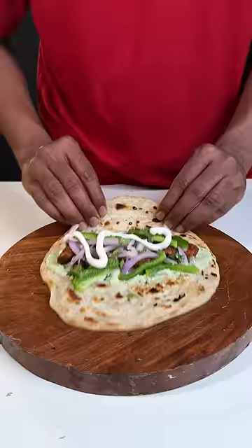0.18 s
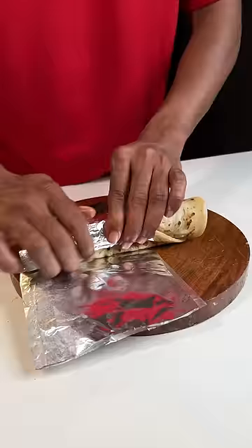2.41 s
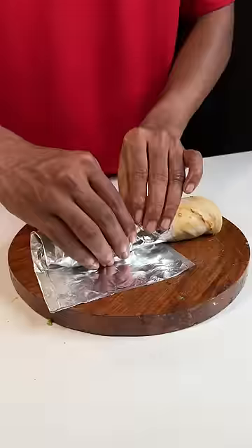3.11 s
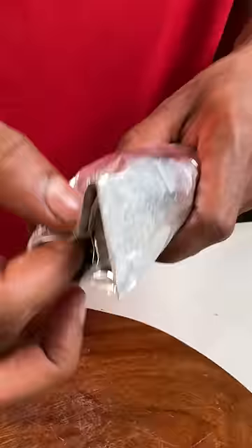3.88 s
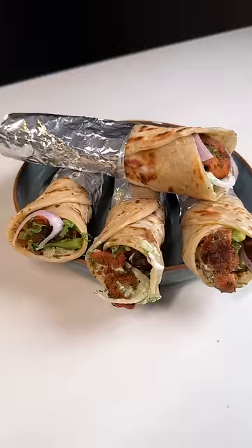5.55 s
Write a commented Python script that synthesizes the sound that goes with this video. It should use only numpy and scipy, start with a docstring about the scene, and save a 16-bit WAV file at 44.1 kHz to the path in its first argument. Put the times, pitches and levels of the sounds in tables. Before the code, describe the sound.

In a quiet kitchen, hands roll a flatbread on a wooden board: an early tap, faint ticks, soft brushing and dull knocks, some cut off abruptly. A stronger thump and swish land just after two seconds. Then foil takes over, hissing, crinkling and snapping in bright, dense bursts as it is folded and twisted. It stops after about five seconds, leaving low room noise. Close, wide stereo phone microphone.

```python
"""Aluminium foil hisses, crackles and snaps as hands fold and twist it round a flatbread in a quiet kitchen.
Its rustle is noise under squeeze envelopes; its snaps are short noise bursts, each with a pop at its own pitch.
Before that the hands roll the bread: brushes of noise and ticks, and modes that knock on a wooden board and table.
Some booms and brushes are chopped off. The board's edge is tapped early; pitched and low room noise lie below."""
import sys
import numpy as np
from scipy import signal
from scipy.fft import rfft, irfft, next_fast_len
from scipy.io import wavfile
from scipy.ndimage import uniform_filter1d, minimum_filter1d

SR = 44100
rng = np.random.default_rng(int(sys.argv[2]) if len(sys.argv) > 2 else 0)


def file_out(sig):
    """Save sig as 16-bit WAV at sys.argv[1]."""
    # one column per channel
    cols = np.atleast_2d(sig).T
    # limit, then scale
    lim = np.clip(cols, -1, 1)
    pcm = np.round(lim * 32767).astype(np.int16)
    wavfile.write(sys.argv[1], SR, pcm)


def ratio(d):
    """dB to gain"""
    e = np.asarray(d, float) / 20
    return 10 ** e


N = 268569

# Short ticks and snaps: the opening hit and hand ticks, then foil creases from 2.4 s. Each row: start in seconds,
# treble in dB and crack in dB (both before trim), crack pitch in Hz, nominal length in ms.
SNAPS = [(0.0036, -73, -27, 856, 4), (0.0414, -59, -23, 890, 4.4), (0.272, -58.5, -85, 2210, .8),
         (0.3125, -60, -85, 2175, .8), (0.3962, -37.5, -71, 2230, 1.14), (0.4837, -48.5, -74, 2800, 1.6),
         (0.553, -41, -63, 2050, 0.8), (0.8404, -43.5, -62, 2370, 0.87), (0.874, -34, -24.5, 1870, 4),
         (0.906, -35, -42, 2065, 3.4), (0.932, -38.5, -35.5, 2007, 5), (0.9506, -41, -45, 2300, 1.8),
         (0.998, -48, -50, 4840, 2.5), (1.0642, -57, -51, 2260, 2.4), (1.195, -79, -62.5, 2100, 2.3),
         (1.286, -55.5, -64, 2530, .8), (1.2971, -51, -50, 2120, .7), (1.4191, -76.5, -52, 2270, 2),
         (1.624, -55, -45.5, 3800, 3), (1.7301, -52, -26, 3450, 0.74), (2.4411, -20, -15.5, 1374, 0.72),
         (2.476, -31.5, -27, 1106, 1.5), (2.4894, -22, -38, 1180, 9.7), (2.515, -15.5, -33, 2212, 1.9),
         (2.544, -35, -33.5, 2400, 1.2), (2.619, -42.5, -52, 1700, 3.4), (2.642, -32, -36.5, 1670, 1.5),
         (2.68, -16.5, -41, 3720, 1.2), (2.696, -21, -44, 3400, 1), (2.7001, -17.5, -33, 3420, 1),
         (2.709, -19.5, -22, 3400, 1.2), (2.733, -24, -24, 2990, 2), (2.7284, -19.5, -23.5, 3060, 1.6),
         (2.76, -32, -34, 2640, 1.6), (2.82, -27, -43, 3265, 6.3), (2.8472, -23.5, -45, 2500, 6.72),
         (2.8763, -39, -29.5, 2300, 2.1), (2.885, -26.5, -24, 1800, 2.2), (2.9023, -15, -29.5, 1980, 10),
         (2.9407, -29, -47, 3180, 7.4), (2.9737, -23.5, -20.5, 1480, 0.8), (3.0296, -37, -40, 3600, 0.67),
         (2.9898, -42, -29, 873, 2.8), (3.052, -47, -27, 950, 1.15), (3.081, -47, -31, 1040, 1.5),
         (3.093, -48, -38, 897, 1.5), (3.119, -25, -19, 1000, 4.4), (3.148, -23.5, -45, 1913, 2.3),
         (3.157, -15.5, -29.5, 1296, 1.43), (3.1857, -38, -27, 4340, 12), (3.2209, -29, -40.5, 2345, 1),
         (3.247, -27, -42, 2513, 6.2), (3.264, -21.5, -26.5, 1611, 3), (3.2695, -15.5, -26, 2000, 3),
         (3.286, -40.5, -29, 1595, 1.2), (3.2953, -23, -34.5, 2040, 5.8), (3.3003, -32.5, -33.5, 2400, 19),
         (3.3245, -17, -33, 2514, 3.8), (3.3532, -24.5, -31, 2300, 1.6), (3.361, -31, -16.5, 1484, 3.3),
         (3.383, -16, -41, 3310, 1.2), (3.395, -17.5, -33, 3830, 2.8), (3.4136, -25.5, -40, 2000, 2.0),
         (3.45, -25, -39.5, 2950, 2.5), (3.5145, -18.5, -27, 2383, 1.5), (3.5228, -22.5, -28, 3900, 5.6),
         (3.548, -22.5, -20.5, 1530, 4.2), (3.5871, -53.5, -23, 1095, 3), (3.6307, -36, -25.5, 2320, 2),
         (3.6344, -26.5, -43, 1900, 3.7), (3.6511, -35, -41, 3200, 2.7), (3.698, -29.5, -31.5, 2600, 4.4),
         (3.7099, -49.5, -20.5, 2225, 1.3), (3.725, -21, -40.5, 3260, 1.0), (3.73, -22, -14.5, 2190, 2.9),
         (3.762, -28.5, -27, 1506, 2.9), (3.7714, -39.5, -18.5, 1300, 2.0), (3.7817, -31, -43, 2360, 1.8),
         (3.7931, -12.5, -14, 1480, 0.94), (3.8011, -36.5, -19.5, 1300, 1.2),
         (3.8673, -20.5, -29.5, 2387, 1.3), (3.872, -22, -34, 4647, 2), (3.8837, -29.5, -25.5, 4700, 1.8),
         (3.8892, -17.5, -18.5, 4836, 4.8), (3.9, -15.5, -27.5, 2301, 1.5), (3.9293, -43, -30, 4800, 1.4),
         (3.9485, -12.5, -21.5, 5000, 2), (3.962, -16, -26, 3420, 1.5), (3.9779, -19.5, -27.5, 3690, 4.6),
         (4.0065, -23, -13.5, 1780, 3.9), (4.037, -13, -22.5, 4600, 1.5), (4.05, -18, -25.5, 4400, 1.9),
         (4.0548, -18.5, -10, 5200, 0.7), (4.137, -25.5, -27.5, 5200, 2.3),
         (4.1509, -13, -20.5, 5100, 0.76), (4.166, -17, -24, 5000, 2.9), (4.174, -24, -22.5, 4896, 7.7),
         (4.2077, -13, -31, 4400, 1.2), (4.227, -14.5, -29.5, 5000, 2), (4.241, -11, -11.5, 4280, 1.8),
         (4.29, -20.5, -26.5, 4200, 0.57), (4.3056, -45, -36, 4000, 1.7), (4.33, -23, -25.5, 3360, 2.9),
         (4.3442, -18, -19.5, 5090, 1.9), (4.3629, -14, -16, 3910, 2.94), (4.427, -31.5, -29.5, 5300, 1.6),
         (4.462, -10.5, -23.5, 5340, 1.2), (4.4717, -20, -23, 5100, 1.4), (4.495, -27.5, -24.5, 4200, 2.5),
         (4.5046, -21, -28, 5220, 1.4), (4.5213, -22.5, -27.5, 5270, 2.6), (4.5261, -23, -22, 5130, 1.3),
         (4.531, -28, -15.5, 5340, 1.4), (4.534, -32, -36, 5300, 2.0), (4.606, -11.5, -20.5, 5060, 0.66),
         (4.629, -15.5, -24.5, 5300, 1.0), (4.6487, -17.5, -24.5, 5340, 2), (4.657, -29, -28, 5300, 3.1),
         (4.7232, -26, -52.5, 5260, 4), (4.7332, -21.5, -27.5, 5220, 2.0), (4.7375, -27, -28, 5330, 5.9),
         (4.7583, -14.5, -25, 5300, .8), (4.7602, -9.5, -17, 5300, 1.2), (4.7766, -28, -29, 5300, 1.7),
         (4.7984, -25, -35, 4900, 1.8), (4.8227, -17.5, -22.5, 5280, 5.9), (4.8286, -15.5, -35, 5100, 1.5),
         (4.839, -43.5, -44, 5200, 2.0), (4.892, -18, -34, 5245, 1), (4.915, -21.5, -55, 5200, 1),
         (4.9302, -33.5, -32, 5150, 1.65), (4.973, -28.5, -39.5, 5170, 1.3), (4.9992, -29, -44, 5220, 1.2),
         (5.0251, -22, -37, 4500, 0.97), (5.0315, -25.5, -15.5, 3940, 0.46),
         (5.0583, -31, -21.5, 3500, 8.7), (5.0675, -16.5, -30, 5130, 1), (5.0751, -25, -22, 4900, 0.8),
         (5.0918, -36, -24.5, 4800, 2.2), (5.175, -34, -56, 5200, 0.72), (5.249, -21, -21, 3670, 3.6)]
# Knocks. Each row: start in seconds, table level in dB, board level in dB (both before mode levels), contact in
# seconds, damping by the hands (a factor), pitch favoured by the spot struck in Hz, pressure held in seconds.
KNOCKS = [(0.031, -36.5, -23, 0.0053, 2.6, 200, 0.0037), (0.053, -47, -35.5, 0.005, 1, 200, 0.0038),
          (0.101, -45, -38.5, 0.0032, 1.7, 200, 0.016), (0.165, -61.5, -85.5, 0.0033, 0.2, 241, 0.0067),
          (.62, -46, -44.5, 0.044, 1.1, 239, 0.0048), (0.874, -35.5, -46, 0.0041, 0.68, 237, 0.029),
          (1.296, -42.5, -44, 0.0085, 1.36, 237, 0.047), (1.34, -65, -43, 0.021, 2.3, 356, 0.01),
          (1.427, -40, -68.5, 0.028, 1.5, 243, 0.0043), (1.555, -23, -17.5, 0.016, 1.55, 201, 0.0033),
          (1.637, -36, -31, 0.0012, 1.18, 237, 0.0327), (1.741, -40, -34, 0.0073, 3.2, 201, 0.014),
          (2.03, -48.5, -73, 0.0073, 3.9, 241, 0.0045), (2.163, -14, -13, 0.011, 0.8, 269, 0.011),
          (2.202, -46.5, -22.5, 0.0056, 1.7, 356, .004), (2.258, -27, -29.5, 0.0068, 0.77, 240, 0.0061),
          (2.29, -49, -25.5, 0.0058, 2.3, 242, 0.015), (2.851, -61, -23, 0.013, 7.6, 307, 0.0046),
          (3.971, -71, -47, 0.015, 1.1, 348, 0.0069), (4.236, -75, -45, 0.0062, 6.2, 350, 0.0041),
          (5.247, -49, -23, 0.0065, 4.9, 298.8, 0.0047), (5.779, -45.5, -70, 0.015, 2.3, 200, 0.0062)]
# Table modes. Each row: frequency in Hz, relative level in dB, t60 in seconds at damping 1.
TABLE_MODES = [(45, -6, 0.3), (116.5, -4.5, 0.75), (155.3, 0, 0.33)]
# Board modes. Each row: frequency in Hz, relative level in dB, t60 in seconds at damping 1.
BOARD_MODES = [(200, -0.5, 0.26), (237, 2, 0.18), (268.5, 0.5, 0.17), (353.3, -1, 0.31), (392, -5, 0.3),
               (473.3, 2.5, 0.12), (520.3, -3.5, 0.1), (770, -7.5, 0.15)]
# Modes of the board's edge. Each row: frequency in Hz, relative level in dB, t60 in seconds at damping 1.
RIM_MODES = [(556, -38, 0.1), (684, -35, .08), (960, -33, 0.07), (1250, -34, .05)]
# Colour of the foil, snap and brush noise. Each row: frequency in Hz, relative level in dB per Hz.
NOISE_COLOUR = [(240, -42.5), (400, -16), (590, -12.5), (648, -8), (1210, -5.5), (2710, -7.5), (4980, -8),
                (5380, -9), (6490, -5), (7820, -8.5), (10500, -11), (12500, -0.5), (14800, 2.5),
                (15700, -0.5), (16500, -40)]
# Stereo width. Each row: frequency in Hz, side over mid in dB.
WIDTH = [(45, -20), (92, -12), (140, -12.5), (210, -15), (330, -6.5), (500, -4.5), (770, -1.5), (1170, -2),
         (1790, -2.5), (2740, 1), (4190, -1), (6410, 0), (9810, 11), (15000, -6)]
# Room noise spectrum. Each row: frequency in Hz, relative level in dB per Hz.
ROOM_COLOUR = [(15, -55), (30, -24), (45, -15), (80, -16), (118, -10), (249, -18.5), (276, -21),
               (1060, -43.5), (1340, -38.5), (1480, -43), (9270, -56), (12000, -65), (15600, -65),
               (22000, -120)]
# Room noise level. Each row: time in seconds, level in dB before trim.
ROOM_LEVEL = [(0.0, -46), (0.3, -63.5), (1.29, -63.5), (1.54, -66), (1.98, -65), (2.19, -60.5),
              (4.02, -54.5), (4.29, -71.5), (4.56, -74), (4.72, -75), (4.9, -70), (4.95, -60.5), (5.4, -68),
              (5.7, -66), (5.8, -62), (5.92, -67), (6.09, -60)]
# Decay of the kitchen's answer. Each row: frequency in Hz, t60 in seconds.
KITCHEN_DECAY = [(500, 0.44), (3000, 0.29), (14000, 0.078)]
# Noise bands, highest first. Each row: lower edge in Hz, upper edge in Hz.
BANDS = [(8000, 16000), (3700, 8000), (1500, 3700), (300, 1500)]
# Times that end the knocks and swells begun before them, in seconds.
CUTS_S = np.array(np.array([.163, .74, 1.1, 1.54, 1.91, 2.398, 7]))
# Hands brushing bread and board. Each row: peak in seconds, treble in dB, body in dB, body gain per lower band
# in dB, rise in seconds, fall in seconds.
STROKES = [(0, -63, -48.5, 1.5, 0.011, 0.071), (0.171, -74, -93, 8.5, .005, 0.026),
           (0.471, -70, -105, 0.5, 0.25, 0.92), (.8, -73, -86.5, -2.5, 0.046, 0.55),
           (0.645, -44, -46.5, 2, 0.055, 0.062), (0.882, -47, -48, 0, 0.015, 0.088),
           (1.07, -73, -92, 5, 0.0036, 0.11), (1.109, -68.5, -80.5, 2, 0.02, 0.11),
           (1.289, -69.5, -85, -19, 0.1, 0.4), (1.572, -45, -51.5, 7.5, 0.025, 0.1),
           (1.616, -59.5, -43.5, 6, 0.029, 0.046), (1.733, -95.5, -52, -0.5, 0.0079, 0.061),
           (2.163, -14.5, -23.5, -3, 0.0064, 0.082)]
# Squeezes and folds of the foil. Each row: peak in seconds, treble in dB, body in dB before the lower-band gains,
# rise in seconds, fall in seconds.
SQUEEZES = [(2.4, -34, -43, 0.0039, 0.96), (2.493, -19, -47, 0.0076, 0.058),
            (2.526, -29, -34, 0.061, 0.049), (2.665, -32, -45.5, 0.0074, 0.1),
            (2.849, -44, -54, 0.016, 0.051), (2.891, -26.5, -46.5, 0.017, 0.083),
            (2.941, -32.5, -39, 0.11, 0.12), (3.116, -40, -47, 0.0025, 0.26), (3.3, -54.5, -54, 0.2, 0.025),
            (3.395, -36, -42.5, 0.21, 0.11), (3.547, -47, -43, 0.045, 0.12),
            (3.717, -47, -52, 0.058, 0.063), (3.791, -37.5, -42, 0.08, 0.041),
            (3.87, -32.5, -35, 0.0076, 0.055), (3.989, -24, -23.5, 0.12, 0.15),
            (4.248, -31, -33, 0.049, 0.049), (4.359, -43.5, -41.5, 0.13, 0.067),
            (4.499, -43.5, -41.5, 0.0407, 0.23), (4.721, -44, -41, 0.015, 0.27),
            (4.797, -59.5, -49, 0.007, 0.04), (4.825, -32.5, -42, 0.081, 0.013),
            (4.918, -31.5, -35, 0.022, 0.02), (5.069, -46, -45, 0.078, 0.072),
            (5.19, -62, -65, 0.066, 0.085), (5.246, -25.5, -29, 0.044, 0.013),
            (5.265, -47.5, -46.5, 0.029, 0.056)]
# Lower foil bands, thinning and filling out again. Each row: time in seconds, 1.5-3.7 kHz gain in dB,
# 0.3-1.5 kHz gain in dB.
LOWER_BANDS = [(2.4, -2, -2), (2.595, 1.5, -2), (2.625, -6.5, -14), (2.7, -6.5, -14.5), (2.828, -4.5, -20),
               (2.86, -5, -2.5), (3.8, -2.5, -7.5), (3.89, -9, -7.5), (4.201, -6, -14), (4.45, -1.5, -45),
               (4.53, -24.5, -20.5), (4.581, -68, -36), (4.62, -41, -24), (4.7, -65, -47.5),
               (4.739, -48, -16.5), (4.85, -51, -17), (4.88, -50, -26), (4.92, -40, -29),
               (4.97, -19.5, -51), (5.071, -7, -12), (5.188, -24.5, -30), (5.264, -2.5, -7.5)]
# Pitched noise: the early tap's tail, hollow brushing, then ringing foil. Each row: peak in seconds, pitch in Hz,
# width of each of two resonances in Hz, level in dB, rise in seconds, fall in seconds.
PITCHED = [(.02, 955, 399.4, -36.5, .015, 0.091), (.085, 599, 250.6, -43, .05, .06),
           (.042, 2500, 1214, -46, .03, .04), (.185, 2520, 900, -70.5, .012, 0.026),
           (.9, 1915, 500, -47, .03, 0.066), (1.118, 760, 200, -68.5, 0.014, .03),
           (1.575, 1180, 150, -36, 0.011, 0.047), (1.065, 2870, 500, -53.5, 0.0049, 0.042),
           (1.631, 1115, 150, -34, 0.017, 0.012), (2.579, 1160, 250, -34.5, 0.042, 0.038),
           (3.898, 720, 250, -35, 0.0095, 0.022), (4.248, 1178, 150, -39.5, 0.017, 0.07),
           (4.48, 2010, 300, -45.5, 0.017, 0.021), (4.765, 2090, 150, -68.5, 0.011, 0.11),
           (4.829, 2050, 150, -61.5, 0.11, 0.05)]

DIRECT_HZ = 11000  # treble above comes straight from the hands, more alike at both ports
SWELL_DB = 20  # span of a rise or fall time
TREBLE_TRIM_DB, CRACK_TRIM_DB, RING_TRIM_DB = -3, -2.5, -2
SPREAD_DB_PER_OCT, SNAP_LOWER_SHARE = 10.5, 0.93  # crack falls off away from its pitch; share of lower-band gains
SPIKE_S, SPIKE_GAIN = 0.0003, 0.3  # the sharp instant of a snap, and its extra size
RING_CYCLES = 1.8
FAVOUR_DB_PER_OCT, PURER_DB_PER_OCT_S = 9, 900  # loss away from the favoured pitch, more under a long press


def unit(x):
    """Scale to rms 1."""
    return x / np.sqrt(np.mean(x ** 2) + 1e-20)


def along(points, hz):
    """Interpolate (Hz, value) points on a log axis."""
    f, v = np.transpose(points)
    return np.interp(np.log(hz + 1), np.log(f + 1), v)


def gains(rows):
    """One gain per sample for each dB column, near silent outside the table."""
    s, *columns = np.transpose(rows)
    t = np.arange(N) / SR
    return np.array([ratio(np.interp(t, s, db, -150, -150)) for db in columns])


def filtered(x, response):
    """Multiply the spectrum of x by a response of frequency."""
    m = next_fast_len(N + 8192)
    return irfft(rfft(x, m) * response(np.fft.rfftfreq(m, 1 / SR)), m)[..., :N]


def stereo(mid, other, alike):
    """Two spaced ports: the side is partly the mid a quarter cycle off, partly made from the other signal."""
    same = lambda hz: np.clip(alike, 0, 1) ** np.where(hz > DIRECT_HZ, 0.5, 1)
    width = lambda hz: ratio(along(WIDTH, hz))
    shifted = filtered(mid, lambda hz: 1j * same(hz) * width(hz))
    rest = filtered(other, lambda hz: np.sqrt(1 - same(hz) ** 2) * width(hz))
    side = shifted + rest
    return np.array([mid + side, mid - side])


def blotchy(depth_db):
    """Two noises sharing one random, briefly lasting patchwork of louder and softer frequencies."""
    z = signal.stft(rng.standard_normal((2, N)), nperseg=256)[2]
    field = rng.standard_normal(z.shape[1:])
    field = uniform_filter1d(field, size=3, axis=0)
    field = uniform_filter1d(field, size=5, axis=1)
    return signal.istft(z * ratio(depth_db * unit(field)), nperseg=256)[1][:, :N]


def banded(envelopes, even=False):
    """Two noises gated by one envelope a band, every band shaped by the noise colour."""
    out = np.zeros((2, N))
    for (low_hz, high_hz), envelope in zip(BANDS, envelopes):
        sos = signal.butter(8, [low_hz, high_hz], "band", fs=SR, output="sos")
        colour = lambda x: filtered(signal.sosfiltfilt(sos, x), lambda hz: ratio(along(NOISE_COLOUR, hz)))
        noise = blotchy(depth_db=3)
        noise = np.sign(noise) if even else unit(noise)  # even: every burst reaches its peak
        out = out + colour(noise * envelope) / np.std(colour(noise[0]))
    return out


def bursts(when_s, size, decay_s, rise_s, spike=0):
    """Envelopes, one a band: a quick swell that peaks at each time, then dies."""
    k = np.arange(round(0.046 * SR))
    u = k / SR - 2 * rise_s
    shape = np.where(u < 0, np.exp(-(u / rise_s) ** 2), np.exp(-u / decay_s[:, None]))
    shape = shape * (1 + spike * np.exp(-(u / SPIKE_S) ** 2))
    at = np.clip(((when_s[:, None] - 2 * rise_s) * SR).astype(int) + k, 0, N)
    return np.array([np.bincount(at.ravel(), (s[:, None] * shape).ravel(), N + 1)[:N] for s in size.T])


def crackle(count, spread_db, colour_db, hiss):
    """Tiny grains at random times over a hiss; mean power 1 in each band."""
    draw = rng.random((count, 3))
    own = rng.standard_normal((count, len(BANDS)))
    rare = -np.log(draw[:, 1:2] + 0.02)  # few large, many small
    size = ratio(spread_db * rare + colour_db * own)
    decay_s = 0.0003 + 0.003 * draw[:, 2] ** 3
    grains = bursts(draw[:, 0] * N / SR, size, decay_s, rise_s=0.0003)
    return np.array([unit(hiss + unit(g)) for g in grains])


def gesture(t, peak_s, rise_s, fall_s):
    """A swell, straight in dB, up to its peak and down again."""
    away = np.where(t < peak_s, (peak_s - t) / max(rise_s, 1e-3), (t - peak_s) / max(fall_s, 1e-3))
    return ratio(-SWELL_DB * away)


def swells(rows):
    """Summed gestures, one envelope a band: each climbs to its peak and sinks until the next cut."""
    t, out = np.arange(N) / SR, np.zeros((len(BANDS), N))
    for peak_s, levels_db, rise_s, fall_s in rows:
        until_s = CUTS_S[CUTS_S > peak_s][0]
        out = out + ratio(levels_db)[:, None] * (gesture(t, peak_s, rise_s, fall_s) * (t < until_s))
    return out


def ringing(modes, t, level_db, damping, waver, hold_s=0):
    """Damped modes, level for hold_s, at new strengths; pressing hands make their phases drift."""
    drifts = np.cumsum(rng.standard_normal((len(modes), 22)), axis=1)
    scatter_db = rng.normal(0, 2, len(modes))
    levels_db = np.broadcast_to(level_db, len(modes))
    knots_s = np.linspace(0, t[-1], drifts.shape[1])
    out = np.zeros(len(t))
    for (hz, db, t60_s), drift, scatter, level in zip(modes, drifts, scatter_db, levels_db):
        decay_db = 60 * damping * np.maximum(t - hold_s, 0) / t60_s
        phase = 2 * np.pi * hz * t + waver * np.interp(t, knots_s, drift - drift[0])
        out = out + ratio(level + db + scatter - decay_db) * np.sin(phase)
    return out


def room_tone():
    """Mostly low noise of the kitchen, its level moving."""
    pair = filtered(rng.standard_normal((2, N)), lambda hz: ratio(along(ROOM_COLOUR, hz)))
    return ratio(-2.5) * gains(ROOM_LEVEL) * stereo(*unit(pair), alike=0.35)


def brush():
    """Skin on bread and wood: mostly hiss, with a softer, finer grain than the foil."""
    rows = []
    for peak_s, top, body, tilt, rise_s, fall_s in STROKES:
        rows.append((peak_s, [top, body, body + tilt, body + 2 * tilt], rise_s, fall_s))
    rub = swells(rows) * crackle(count=5000, spread_db=8.0, colour_db=12.5, hiss=17.0)
    return stereo(*banded(rub), alike=0.24)


def pitched_noise():
    """The early tap's tail, hollow brushing, then ringing foil: noise through a doubled resonance, swelling."""
    t, out = np.arange(N) / SR, np.zeros((2, N))
    for peak_s, hz, wide_hz, db, rise_s, fall_s in PITCHED:
        resonance = lambda f: (1j * f * wide_hz / (hz * hz - f * f + 1j * f * wide_hz)) ** 2
        tone = unit(filtered(rng.standard_normal((2, N)), resonance))
        out = out + ratio(db) * gesture(t, peak_s, rise_s, fall_s) * tone
    return stereo(*out, alike=0.6)


def rim_tap():
    """One hard tap near the start rings the modes of the board's edge, strongest at the attack."""
    t = np.arange(round(0.16 * SR)) / SR
    attack = 1 + 5.1 * np.exp(-t / 0.0049)
    tap = np.pad(ringing(RIM_MODES, t, 0, 0.86, waver=1.2) * attack, (110, N))[:N]
    tap = signal.sosfilt(signal.butter(2, 260, "high", fs=SR, output="sos"), tap)
    return stereo(tap, tap, alike=1.0)


def lower_bands_db(when_s):
    """Gain of each foil band at these times; only the two lower ones move."""
    s, mid, low = np.transpose(LOWER_BANDS)
    return np.array([0 * when_s, 0 * when_s, np.interp(when_s, s, mid), np.interp(when_s, s, low)])


def pops(when_s, level_db, hz):
    """A few dying cycles at each snap's own pitch."""
    k = np.arange(round(0.012 * SR))
    cycles = hz[:, None] * k / SR
    fade = np.exp(-cycles / RING_CYCLES) * (1 - np.exp(-cycles ** 2))
    wave = ratio(level_db)[:, None] * np.sin(2 * np.pi * cycles) * fade
    at = (when_s[:, None] * SR).astype(int) + k
    return np.bincount(at.ravel(), wave.ravel(), N)[:N]


def kitchen(x):
    """Each frequency of the room's answer dies at its own speed."""
    hz, t, z = signal.stft(rng.standard_normal((2, SR // 3)), SR, nperseg=256)
    decay_db = -60 * t / along(KITCHEN_DECAY, hz)[:, None]
    tail = signal.istft(z * ratio(decay_db), SR, nperseg=256)[1]
    return signal.fftconvolve(x, tail / np.linalg.norm(tail[0]), axes=1)[:, :N]


def foil_and_snaps():
    """Foil rustle of many small buckles; the opening hit, hand ticks and foil creases snap and wake the room."""
    effort = swells([(s, [top, body, body, body], rise, fall) for s, top, body, rise, fall in SQUEEZES])
    lower = ratio(lower_bands_db(np.arange(N) / SR))
    rustle = effort * lower * crackle(count=2500, spread_db=5.2, colour_db=3.5, hiss=0.9)

    s, top, crack, hz, length_ms = np.transpose(SNAPS)
    centres_hz = np.sqrt(np.prod(BANDS, axis=1))[1:, None]
    octaves = np.abs(np.log2(centres_hz / hz))
    body = crack + CRACK_TRIM_DB - SPREAD_DB_PER_OCT * octaves + SNAP_LOWER_SHARE * lower_bands_db(s)[1:]
    size = ratio(np.vstack([top + TREBLE_TRIM_DB, body]).T)
    decay_s = 0.87 * np.abs(length_ms) / 1000
    snaps = banded(bursts(s, size, decay_s, rise_s=0.0004, spike=SPIKE_GAIN), even=True)
    snaps = snaps + pops(s, crack + RING_TRIM_DB + rng.normal(0, 1.7, len(s)), hz)
    room = ratio(-19) * kitchen(snaps)
    return stereo(*(banded(rustle) + snaps + room), alike=0.43)


def knocks():
    """A soft contact thumps and drives the modes of table and board; echoes blur them until the next cut."""
    out, t = np.zeros((2, N + SR)), np.arange(SR // 2) / SR
    dull = signal.butter(2, [120, 650], "band", fs=SR, output="sos")
    for s, table_db, board_db, contact_s, damping, spot_hz, hold in KNOCKS:
        hold_s = abs(hold)
        octaves = np.abs(np.log2(np.transpose(BOARD_MODES)[0] / spot_hz))
        struck_db = board_db - (FAVOUR_DB_PER_OCT + PURER_DB_PER_OCT_S * hold_s) * octaves
        table = ringing(TABLE_MODES, t, table_db, damping, waver=0.3)
        board = ringing(BOARD_MODES, t, struck_db, damping, waver=0.8, hold_s=hold_s)
        thump_noise = unit(signal.sosfilt(dull, rng.standard_normal(len(t))))
        thump = ratio(board_db - 6.5 - 60 * damping * t / 0.14) * thump_noise
        knock = (table + board + thump) * (1 - np.exp(-(t / contact_s) ** 2))

        echoes = rng.standard_normal((2, len(t))) * ratio(-60 * t / 0.3)
        echoes = echoes / np.linalg.norm(echoes[0])
        wet = signal.fftconvolve(knock[None], echoes, axes=1)[:, :len(t)]
        until_s = CUTS_S[CUTS_S > s][0]
        gate = np.clip((until_s - s - t) * SR / 88, 0, 1)  # closes over 88 samples
        out[:, round(s * SR):][:, :len(t)] += [knock + 0.43 * wet[0], 0.26 * wet[1]] * gate
    mid = out[0, :N]
    skew = filtered(mid, lambda hz: 1j * ratio(-22.5)) + out[1, :N]
    return mid * ratio([[0.8], [-0.8]]) + [skew, -skew]  # slightly off centre


def scene():
    """All sources at the two ports."""
    return foil_and_snaps() + brush() + knocks() + rim_tap() + pitched_noise() + room_tone()


def roll_off(x):
    """The treble ends steeply here."""
    return signal.sosfilt(signal.butter(12, 16970, fs=SR, output="sos"), x)


def record(dry):
    """The phone's microphone drops the deepest bass and a fast limiter holds the peaks."""
    thin = signal.sosfilt(signal.butter(2, 35, "high", fs=SR, output="sos"), dry)
    needed = np.minimum(1, 0.85 / (np.abs(thin).max(axis=0) + 1e-9))
    gain = uniform_filter1d(minimum_filter1d(needed, size=129), size=64)
    return roll_off(thin * gain)


dry = scene()
out = record(dry)
file_out(out)
```